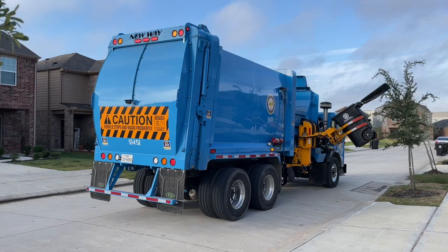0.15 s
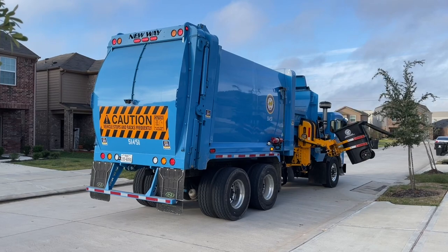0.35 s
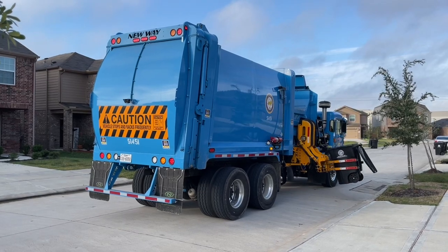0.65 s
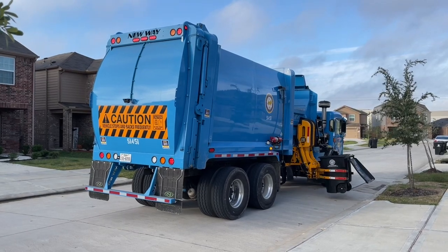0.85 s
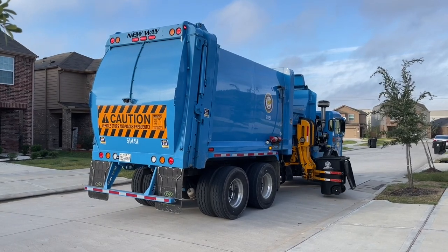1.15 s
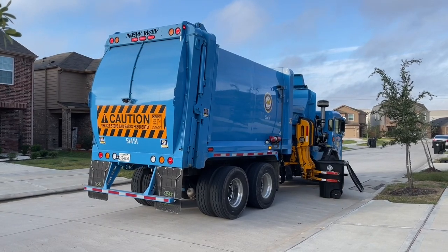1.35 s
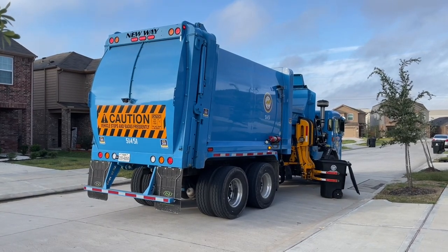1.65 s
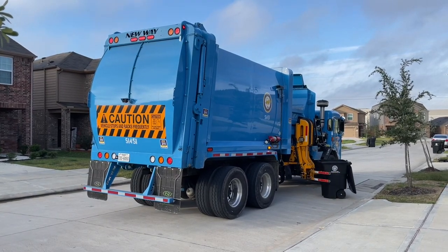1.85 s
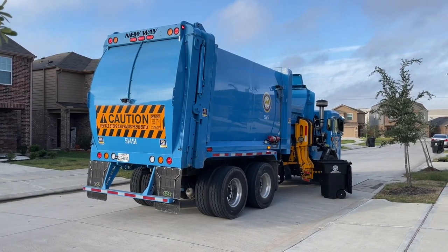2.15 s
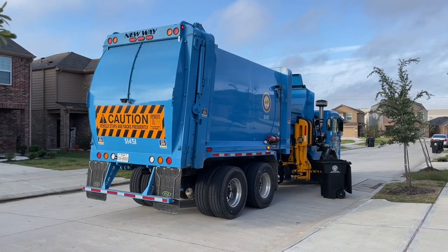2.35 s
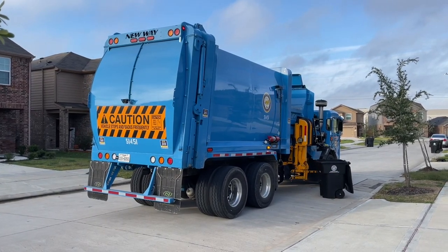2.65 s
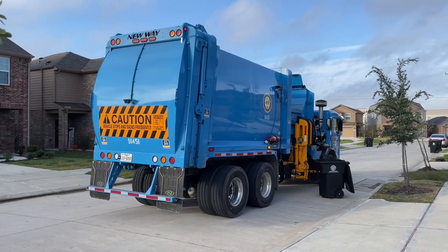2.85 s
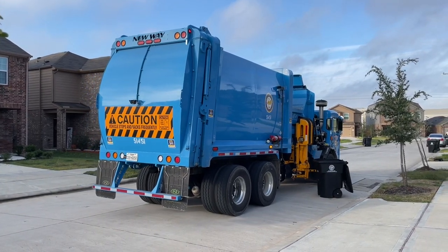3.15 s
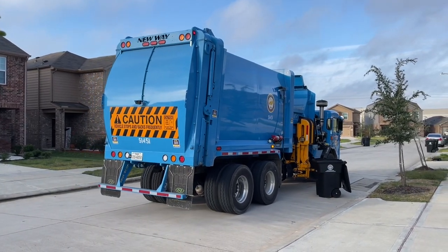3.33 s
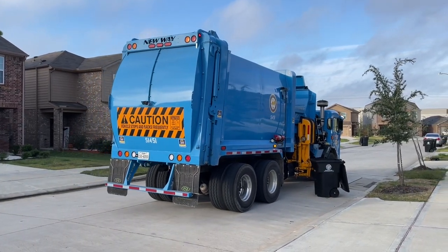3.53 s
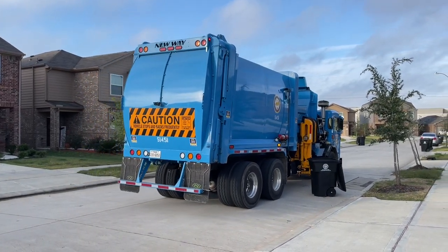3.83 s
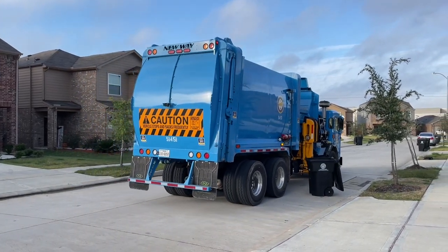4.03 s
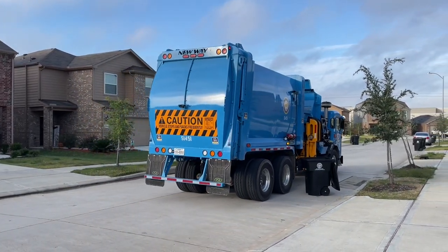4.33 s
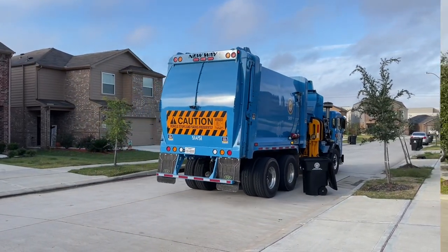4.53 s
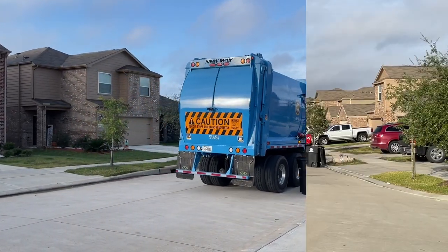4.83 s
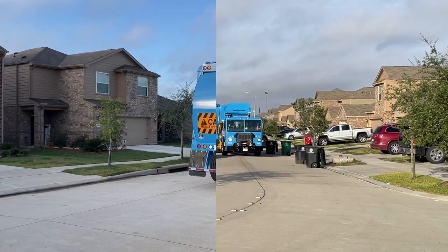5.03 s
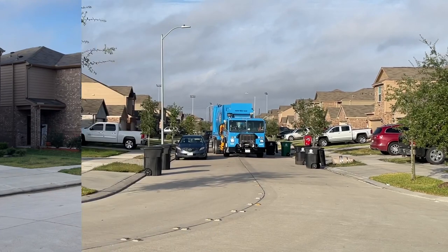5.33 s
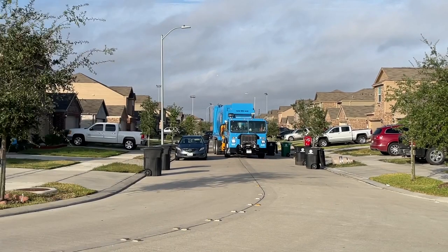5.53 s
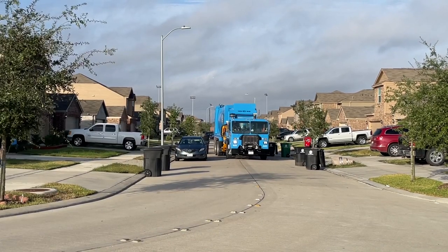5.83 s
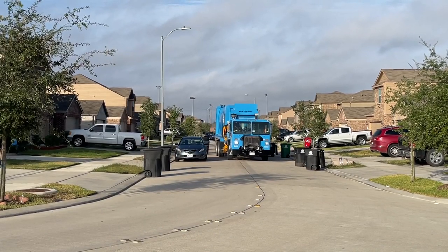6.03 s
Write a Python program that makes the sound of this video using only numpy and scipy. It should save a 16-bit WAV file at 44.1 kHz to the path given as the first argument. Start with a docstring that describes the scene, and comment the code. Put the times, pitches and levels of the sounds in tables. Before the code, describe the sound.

Outdoors on a residential street, heavy wind rumbles and pops on a handheld stereo microphone while a diesel garbage truck idles. Its arm gives brief squeaks and ticks, then an empty plastic bin lands with two hollow, deep booms and rattling knocks. A sharp air-brake hiss follows, then a clank, and the engine revs as the truck drives off with whining gears. The last moment is a quieter, distant engine with wind.

```python
"""Wind buffets and pops on a pair of microphone ports while a refuse truck idles: low noise and chirped pulses.
Its arm squeaks as frequency glides and ticks; a plastic cart booms twice on the road through its resonances.
The brakes vent as shaped noise with a whistle, then the truck pulls away: exhaust orders as sines, noise
throbbing with the firings, and whining gears and turbo. From 5.4 s the engine sound is fainter."""
import sys
import numpy as np
from scipy import signal
from scipy.fft import rfft, irfft, next_fast_len
from scipy.io import wavfile
from scipy.ndimage import uniform_filter1d

SR = 44100
rng = np.random.default_rng(int(sys.argv[2]) if len(sys.argv) > 2 else 0)


def dump(signal):
    """Clip the signal to [-1, 1] and save it as 16-bit WAV at the path in sys.argv[1]."""
    limited = np.clip(np.atleast_2d(signal).T, -1, 1)
    pcm = np.round(limited * 32767).astype(np.int16)
    wavfile.write(sys.argv[1], SR, pcm)


N = 272427
T = np.arange(N) / SR
M = next_fast_len(N + N % 2)   # transform length
HZ = np.maximum(np.arange(M // 2 + 1) * SR / M, 1)

# Engine noise: (time [s], rumble [dB], clatter [dB], injector hiss [dB])
LOAD = [(0, -47, -35, -41), (.9, -59, -33.5, -43), (1.15, -32.5, -34, -47.5), (1.6, -27.5, -35.5, -47.5),
        (2.2, -28, -34.5, -47), (2.6, -30, -32.5, -44.5), (3.6, -30.5, -31.5, -40.5),
        (4.08, -24.5, -31, -39), (4.58, -22, -29.5, -38), (5.0, -27, -34, -43), (5.18, -27.5, -37, -46),
        (5.33, -31.5, -40.5, -51), (5.5, -39.5, -40, -51.5), (6.18, -37, -37.5, -50.5)]
# Wind on the ports, one list per gusty stretch: (time [s], buffet level [dB])
GUSTS = [
    [(0, -17.5), (.1, -26.5), (.21, -19.5), (.27, -28), (.31, -26), (.35, -33), (.4, -21.5), (.5, -24),
     (.72, -28), (.82, -26.5), (.92, -32.5), (1.0, -31.5), (1.12, -40), (1.18, -26), (1.3, -54)],
    [(5.1, -31.5), (5.38, -33), (5.46, -27.5), (5.52, -33), (5.7, -23.5), (5.8, -36.5), (6.0, -36),
     (6.12, -29.5), (6.18, -41)],
]


def amp(db):
    """Amplitude ratio from a level in decibels."""
    return 10 ** (np.asarray(db) / 20)


def rms_one(x):
    """Normalization of the mean square: scale to unit rms."""
    return x / np.sqrt(np.mean(x ** 2) + 1e-20)


def in_time(rows):
    """Linear interpolation: each column per sample, then a gate that is open while the curve lasts."""
    s, *columns = np.transpose(rows)
    gate = np.clip(np.minimum(T - s[0], s[-1] - T) * 200 + 1, 0, 1)   # 5 ms edges
    return [np.interp(T, s, c) for c in columns] + [gate]


def span(s, length, first, last):
    """Linear glide from first to last, holding its end values outside the event."""
    return first + (last - first) * np.clip((T - s) / length, 0, 1)


def decay_db(s, t60_s):
    """Exponential decay: a level falling 60 dB in t60_s from time s, flat before."""
    return -60 * np.maximum(T - s, 0) / t60_s


def at_hz(points):
    """Interpolation on logarithmic frequency: a spectrum table on the FFT grid."""
    hz, value = np.transpose(points)
    return np.interp(np.log(HZ), np.log(hz), value)


def coloured(x, spectrum):
    """Spectral shaping by multiplication in frequency, falling steeply beyond the ends; rms 1."""
    (low_hz, low_db), (high_hz, high_db) = spectrum[0], spectrum[-1]
    ends = [(low_hz / 2, low_db - 40)] + list(spectrum) + [(high_hz * 2, high_db - 40)]
    return rms_one(irfft(rfft(x, M) * amp(at_hz(ends)), M)[:N])


def drift(rate_hz):
    """Low-pass filtered chance: a slow random curve of rms 1, drawn at every 8th sample."""
    r = np.exp(-2 * np.pi * rate_hz * 8 / SR)
    draws = rng.standard_normal(N // 8 + 5002)
    slow = signal.lfilter([1], [1, -2 * r, r * r], draws)[5000:]   # skip the settling
    return np.interp(np.arange(N) / 8, np.arange(len(slow)), rms_one(slow))


def tone(hz, level_db, waver):
    """Random frequency and amplitude modulation: a sine whose pitch and strength waver."""
    turns = np.cumsum(hz * (1 + waver * drift(29.6))) / SR
    return np.sqrt(2) * amp(level_db + 2.5 * drift(10)) * np.sin(2 * np.pi * turns)


def resonate(x, hz, width_hz):
    """Damped oscillator as a two-pole resonance, gain 1 on top."""
    r = np.exp(-np.pi * width_hz / SR)
    poles = [1, -2 * r * np.cos(2 * np.pi * hz / SR), r * r]
    return signal.lfilter([(1 - r * r) / 2, 0, (r * r - 1) / 2], poles, x)


def modes_of(x, modes, sign=1):
    """Modal superposition: parallel resonances, signs alternating if sign is -1; rms 1."""
    return rms_one(sum(sign ** k * amp(db) * rms_one(resonate(x, hz, width_hz))
                       for k, (hz, width_hz, db) in enumerate(modes)))


def small_pops():
    """Random arrivals: lesser eddies, as (time, level, first Hz), follow the strength of the gust."""
    pops_per_s, highest_db = 70, 4   # level above the buffet
    rows = []
    for gust in GUSTS:
        s, db = np.transpose(gust)
        when, weakness, pitch = rng.random((3, round(pops_per_s * (s[-1] - s[0]))))
        at = s[0] + (s[-1] - s[0]) * when
        rows += zip(at, np.interp(at, s, db) + highest_db - 12 * weakness, 400 + 730 * pitch)
    return rows


def wind():
    """Turbulent pressure: lumpy low noise, partly own to each port, and pops falling in pitch as eddies slow."""
    # Spectrum of the wind noise: (frequency [Hz], relative density [dB])
    buffet = [(35, -1.5), (70, 9.5), (130, 1), (250, -6.5), (450, -20), (900, -63)]
    # Eddies bursting on the ports: (time [s], level [dB], first frequency [Hz])
    large_pops = [(.005, -12, 450), (.022, -10.5, 1074), (.058, -16, 460), (.085, -10.5, 443),
                  (.221, -5.5, 895), (.276, -14, 710), (.298, -11, 984), (.304, -11, 433), (.374, -13, 510),
                  (.386, -9.5, 640), (.402, -17, 590), (.412, -10, 705), (.418, -10, 936), (.436, -9, 1005),
                  (.457, -13.5, 613), (.521, -7.5, 874), (.526, -11, 750), (.566, -16, 1470),
                  (.572, -16, 890), (.581, -8, 950), (.6, -23, 610), (.625, -9.5, 950), (.634, -12, 817),
                  (.658, -14.5, 913), (.684, -12.5, 900), (.697, -29, 490), (.733, -10.5, 424),
                  (.76, -11, 910), (.777, -16, 866), (.794, -6.5, 650), (.806, -13, 694), (.823, -21, 587),
                  (.85, -15, 454), (.891, -11, 596), (.903, -23, 800), (2.343, -11.5, 524),
                  (5.199, -15, 800), (5.204, -12, 1006), (5.295, -16.5, 600), (5.353, -19, 700),
                  (5.394, -16, 696), (5.599, -17, 750), (5.655, -19.5, 490), (5.676, -19, 477),
                  (5.711, -10.5, 1037), (5.721, -20, 546), (5.817, -20, 448), (5.96, -16, 453),
                  (6.069, -15, 552)]
    own_db, end_hz, second_harmonic, rough_share = -15, 75, 0.23, 0.26
    mean_sweep_s, rise_s, fade_s = 0.00688, 0.0029, 0.0077

    lumps = amp(3.3 * drift(18))
    shared, own = (coloured(rng.standard_normal(N) * lumps, buffet) for _ in range(2))
    strength = sum(gate * amp(db) for db, gate in map(in_time, GUSTS))
    out = strength * (shared + amp(own_db) * own * [[1], [-1]])
    ragged = coloured(rng.standard_normal(N), [(150, 1.0), (500, -9.5), (1100, -32)])
    t, pops = T[:SR // 10], list(large_pops) + small_pops()
    for (s, db, hz), (start, skew, size) in zip(pops, rng.random((len(pops), 3))):
        sweep_s = mean_sweep_s * (0.644 + 0.74 * size)   # eddies differ in size
        turns = end_hz * t + (hz - end_hz) * sweep_s * (1 - np.exp(-t / sweep_s)) + start
        # one port feels it a little sooner
        angle = 2 * np.pi * (turns + 0.26 * (skew - .5) * np.array([[1], [-1]]))
        pulse = np.sin(angle) + second_harmonic * np.sin(2 * angle)   # lopsided pressure
        pulse = pulse + rough_share * ragged[round(s * SR) % (N - len(t)):][:len(t)]
        envelope = amp(db) * (1 - np.exp(-t / rise_s)) * np.exp(-t / fade_s)
        i = min(round(s * SR), N - 1)
        out[:, i:i + len(t)] += (envelope * pulse)[:, :N - i]
    return out


def pump():
    """Periodic displacement as one sine, its level following the clatter."""
    hz, start_db = 665, -51.5
    clatter_rise_db = in_time(LOAD)[1] - LOAD[0][2]
    return tone(hz, start_db + clatter_rise_db, waver=.0022)


def squeaks():
    """Stick-slip friction of the arm and brakes: sine glides roughened in pitch and strength."""
    # (time [s], length [s], first frequency [Hz], last frequency [Hz], level [dB], roughness [Hz])
    glides = [(.135, .025, 4950, 5200, -34, 120), (.16, .07, 5500, 7800, -42, 150),
              (.18, .025, 6450, 6600, -41, 80), (.235, .03, 8400, 8600, -41, 60),
              (.185, .02, 9900, 10000, -46, 80), (.2, .06, 11000, 12800, -48, 150),
              (.55, .07, 10800, 12800, -51, 150), (.195, .045, 3650, 3950, -32, 40),
              (.32, .03, 9950, 10000, -47, 80), (.45, .035, 5700, 5750, -43, 80),
              (.712, .035, 3380, 3500, -39, 150), (.742, .028, 3530, 3680, -32, 60),
              (.768, .055, 3480, 3650, -38, 200), (2.36, .012, 3650, 3650, -35, 100),
              (2.392, .012, 3650, 3650, -28, 100), (.137, .018, 4400, 4500, -34, 120),
              (.48, .02, 4500, 4600, -43, 120)]
    out = np.zeros(N)
    slip, grip = drift(300), 1 + .4 * drift(150)
    for s, length, first_hz, last_hz, db, rough_hz in glides:
        progress = np.clip((T - s) / length, 0, 1)
        hz = first_hz + (last_hz - first_hz) * progress + rough_hz / 2 * slip
        envelope = amp(db) * np.sqrt(np.abs(np.sin(np.pi * progress)))
        out += envelope * grip * np.sin(2 * np.pi * np.cumsum(hz) / SR)
    return out


def arm_ticks():
    """Impact and damping: steel ticks in the arm are bright noise under exponential decay."""
    # (time [s], initial level [dB])
    ticks = [(0.56, -30), (1.122, -26), (1.1524, -41), (1.5093, -32.5), (1.58, -51), (1.881, -30.5),
             (1.9227, -38)]
    steel = coloured(rng.standard_normal(N),
                     [(1500, 19.0), (3000, 17.0), (6000, 12.0), (11000, 4.5), (15500, -9)])
    return sum((T >= s) * amp(db + decay_db(s, t60_s=.076)) for s, db in ticks) * steel


def brake_linkage():
    """Modal ringing as the brake linkage lets go: filtered noise with a fast decay and a slow tail."""
    # Clank resonances: (frequency [Hz], width [Hz], relative level [dB])
    clank = [(1950, 300, -7), (2950, 350, -2), (3200, 300, 0), (3430, 300, -3), (4400, 600, -6)]
    s, rise_s = 3.784, .0083
    envelope = sum(amp(db + decay_db(s, t60_s)) for db, t60_s in [(-20, .07), (-29, .3)])
    return span(s, rise_s, 0, .83) * envelope * modes_of(rng.standard_normal(N), clank)


def cart():
    """Modal excitation: the hollow body booms and drums, and each blow sets the stiff parts crackling."""
    # Resonances of the cart: (frequency [Hz], width [Hz], relative level [dB])
    body_modes = [(62, 26, -2.5), (136.5, 16, 0), (197, 53, -2.5), (250, 32, -0.5), (270, 22, -0.5),
                  (326, 27, -1), (370, 260, -8.5), (725, 77, -4), (844, 33, -7.5), (1096, 127, -7.5),
                  (1410, 160, -10.5), (1690, 170, -13), (2180, 350, -18)]
    # Booms on meeting the road, one list each: (time [s], frequency [Hz], level [dB], wall drumming [dB])
    booms = [
        [(1.357, 107.8, -21, -11), (1.371, 112, -4, -14), (1.393, 109.6, -15, -9.5), (1.427, 94.6, -11, -12.5),
         (1.457, 95, -4, -16), (1.47, 98.2, -27, -14)],
        [(1.478, 84, -12, -17.5), (1.502, 88, -31, -16.5), (1.512, 91, -34, -16), (1.526, 95, -16, -14),
         (1.546, 100, -22, -14), (1.58, 93.2, -14.5, -25), (1.598, 90.0, -48, -16)],
        [(1.606, 89.7, -37, -20), (1.612, 90.4, -42, -17), (1.632, 95.5, -19, -28), (1.67, 92.4, -16, -26),
         (1.694, 89, -43, -18.5), (1.714, 89, -13, -30), (1.74, 92.6, -36, -44)],
        [(1.888, 95.7, -42, -24), (1.896, 99, -9.5, -18.5), (1.924, 100, -13, -17.5), (1.972, 91, -38, -21.5)],
    ]
    # Blows on the road: (time [s], level [dB])
    blows = [(1.355, -18), (1.371, -28), (1.384, -28), (1.398, -23), (1.414, -27), (1.43, -32),
             (1.447, -26), (1.462, -27), (1.506, -24), (1.524, -32), (1.538, -28), (1.579, -29),
             (1.61, -38), (1.695, -35), (1.725, -38), (1.889, -29), (1.924, -32)]
    knocks_per_s, spread_db = 1100, 2
    blow_t60_s, crack_t60_s, crack_db = .14, .05, -1.5   # each blow starts with a short crack

    sizes = amp(spread_db * np.minimum(rng.exponential(1, N), 3)) * rng.choice([-1, 1], N)
    knocks = (rng.random(N) < knocks_per_s / SR) * sizes
    walls = modes_of(rng.standard_normal(N), body_modes[:7], sign=-1)
    stiff = modes_of(knocks, body_modes[6:], sign=-1)
    out = np.zeros(N)
    for rows in booms:
        hz, db, wall_db, gate = in_time(rows)
        boom = np.sqrt(2) * amp(db) * np.sin(2 * np.pi * np.cumsum(hz) / SR)
        out += gate * (boom + amp(wall_db) * walls)
    for s, db in blows:
        envelope = amp(db + decay_db(s, blow_t60_s)) + amp(db + crack_db + decay_db(s, crack_t60_s))
        out += (T >= s) * envelope * stiff
    # plastic makes a soft contact
    return signal.sosfilt(signal.butter(2, 3200, fs=SR, output="sos"), out)


def valve():
    """Flow-excited tones: the valve hoots at two pitches about an octave apart."""
    # (time [s], length [s], first frequency [Hz], last frequency [Hz], first level [dB], last level [dB])
    hoot = (2.19, .075, 991, 991, -35, -40)
    # Its octave, same columns
    octave = (2.19, .08, 2000, 2050, -39, -43)
    edge_s = .023
    out = np.zeros(N)
    for (s, length, first_hz, last_hz, first_db, last_db), waver in [(hoot, .008), (octave, .012)]:
        edge = np.clip(np.minimum(T - s, s + length - T) / edge_s + .5, 0, 1)
        out += edge * tone(span(s, length, first_hz, last_hz), span(s, length, first_db, last_db), waver)
    return out


def vent():
    """Jet noise with flow-excited resonances: bright air, a brief rough whistle, and a duller sigh."""
    # Spectrum of the jet: (frequency [Hz], relative density [dB])
    jet_colour = [(1200, -15), (2200, -6), (4000, -7), (6000, -7), (8000, -5), (9200, -2), (10800, 0),
                  (12500, -5), (15800, -12)]
    # Pipes the sigh rings in: (frequency [Hz], width [Hz], relative level [dB])
    pipes = [(2000, 200, -2), (3100, 300, -1), (3600, 250, 0), (4200, 300, -1), (4900, 350, -1),
             (6200, 500, -1), (7200, 500, -4)]
    start_s, opening_s, peak_s, hold_s = 2.163, .013, 2.256, .02
    from_peak_s = np.abs(T - peak_s)

    swell_db = span(start_s, peak_s - start_s, -29, -20)
    jet_db = swell_db - 165 * np.maximum(T - peak_s - hold_s, 0)   # falls 165 dB/s after the hold
    jet = amp(jet_db + 1.5 * drift(40)) * coloured(rng.standard_normal(N), jet_colour)
    jet_body = irfft(rfft(jet, M) * (HZ < 7500), M)[:N]
    jet -= span(start_s, .04, .55, 0) * jet_body   # starts thin; its lower part fills in

    whistle_hz = 11150 - 600 / 2 * (1 + np.tanh((T - peak_s) / .012 / 2))   # drops 600 Hz at the peak
    whistle_db = -20.5 - 6 * ((T - 2.252) / .024) ** 2   # sings briefly
    whistle = np.sin(2 * np.pi * np.cumsum(whistle_hz + 50 * drift(200)) / SR)
    whistle *= amp(whistle_db) * (1 + .35 * drift(250))

    nozzle = amp(-36 - 90 * from_peak_s) * rms_one(resonate(rng.standard_normal(N), 10750, 900))
    sigh = amp(-28.5 - 62 * from_peak_s) * modes_of(rng.standard_normal(N), pipes, sign=-1)
    return span(start_s - opening_s, opening_s, 0, .98) ** 2 * (jet + whistle + nozzle + sigh)


def gears():
    """Tooth-meshing tones: the axle and timing gears each whine as one gliding sine."""
    # Axle gears: (time [s], frequency [Hz], level [dB])
    axle = [(3.7, 150.7, -36), (3.88, 194.8, -34), (3.996, 214.1, -32.5), (4.3, 234.9, -33.5),
            (4.428, 289.6, -33.5), (4.536, 320.2, -33.5), (4.85, 378.3, -31.5), (4.898, 407.3, -55),
            (4.932, 387, -32), (5.18, 439.5, -37.5)]
    # Timing gear, same columns
    timing = [(4.4, 1070, -50), (4.52, 1160, -39), (4.6, 1195, -42), (4.72, 1220, -41), (4.92, 1235, -40),
              (5.1, 1248, -44), (5.25, 1258, -45), (5.36, 1262, -56)]
    out = np.zeros(N)
    for curve, waver in [(axle, .012), (timing, .002)]:
        hz, level_db, gate = in_time(curve)
        out += gate * tone(hz, level_db, waver)
    return out


def turbo():
    """Blade-passing tone and flow noise: a gliding sine with a rush of air."""
    # Whistle: (time [s], frequency [Hz], level [dB])
    whistle = [(3.9, 9500, -75), (4.15, 10500, -61), (4.35, 11650, -58), (4.47, 12450, -55),
               (4.6, 12900, -55), (4.72, 13130, -55), (4.85, 13170, -55), (5.07, 12950, -60),
               (5.5, 12500, -72)]
    # Rush of air: (frequency [Hz], relative density [dB])
    air_colour = [(8500, -2), (11000, 0), (13500, 0), (15500, -12)]
    air_above_whistle_db = 7
    hz, level_db, gate = in_time(whistle)
    air = amp(level_db + air_above_whistle_db) * coloured(rng.standard_normal(N), air_colour)
    return gate * (tone(hz, level_db, waver=.003) + air)


def engine():
    """Harmonic synthesis of exhaust orders, and noise modulated at the firing rate that rings in the block."""
    # Idling then pulling: (time [s], firing rate [1/s], firing tone [dB], overtones [dB])
    run = [(0, 33, -47, -47), (2.55, 33, -48, -48), (2.87, 40, -48, -46), (3.4, 49, -48, -40),
           (3.7, 55, -45, -34), (3.87, 60, -39, -21), (4.02, 63.5, -30, -26), (4.15, 67.5, -27, -26),
           (4.29, 70.7, -20, -21), (4.43, 75.5, -23, -20), (4.52, 79, -21, -20), (4.64, 83.5, -17, -23),
           (4.77, 86, -22, -23), (4.94, 87.4, -25, -24), (5.27, 87, -32, -32), (5.4, 87, -42, -42),
           (6.18, 86, -48, -48)]
    # Exhaust orders: (multiple of firing rate [1], relative level [dB])
    orders = [(.5, -26), (1, 2.5), (1.5, -6), (2, -11), (2.5, -13), (3, -17), (3.5, -21), (4, -20),
              (4.5, -24), (5, -26), (6, -28), (7, -27)]
    # Knock of each cylinder in firing order: relative level [dB]
    cylinders_db = [0, -9, -1, -8, 0, -10]
    # Share of the noise that throbs with the firings: (time [s], share [0-1])
    throb = [(0, .25), (1.0, .3), (1.3, .55), (3.0, .5), (3.6, .25), (6.18, .15)]
    # Colour of the exhaust pipe: (frequency [Hz], gain [dB])
    pipe = [(40, -9), (65, .5), (90, -3), (100, -2), (114, 5), (126, -1), (140, -3), (175, 3), (220, -1),
            (300, -3), (600, -2)]
    # Engine block and panels: (frequency [Hz], width [Hz], relative level [dB])
    block_modes = [(653, 166, 9.5), (799, 42, 6), (1374, 120, 7), (2043, 60, 1), (2960, 1430, 5.5),
                   (3706, 360, 1.5), (4260, 170, 1.5)]
    # Spectra of rumble, clatter and injector hiss: (frequency [Hz], relative density [dB])
    rumble_colour = [(15, -37), (25, -53), (48, 2), (91, 0.5), (149, -1), (253, -2), (325, -6.5),
                     (653, -13), (700, -11), (910, -12.5), (1540, -120)]
    clatter_colour = [(260, -2), (450, -17.5), (503, -7.5), (673, -2.5), (951, -1), (1380, 0), (1660, -7),
                      (2060, -5), (2720, -8.5), (3180, -6), (4300, -14), (5140, -18.5), (6500, -17),
                      (8450, -36), (14300, -120)]
    hiss_colour = [(2000, -6), (3500, 6), (5000, 3), (6500, 0), (8200, 0), (9800, -1), (11500, -7),
                   (13300, -8), (15800, -13)]
    knock_share, flare_rise_s, block_db = .87, .0026, -5   # knock decay in firing intervals

    rate, tone_db, overtone_db, _ = in_time(run)
    rumble_db, clatter_db, hiss_db, _ = in_time(LOAD)
    turns = np.cumsum(rate) / SR + 0.4
    strength = amp(np.array(cylinders_db)[turns.astype(int) % 6])
    flare = strength * np.exp(-(turns % 1) / knock_share)
    flare = rms_one(uniform_filter1d(flare, round(flare_rise_s * SR)))
    throbbing = 1 + in_time(throb)[0] * (flare - 1)

    exhaust = np.zeros(N)
    for k, order_db in orders:
        pipe_db = np.interp(k * rate, *np.transpose(pipe))
        level_db = order_db + pipe_db + (tone_db if k < 2 else overtone_db) + 1.1 * drift(4)
        exhaust += np.sqrt(2) * amp(level_db) * np.sin(2 * np.pi * (k * turns + rng.random()))

    rumble = amp(rumble_db + 1.5 * drift(8)) * coloured(rng.standard_normal(N), rumble_colour)
    drive = rng.standard_normal(N) * throbbing
    block = rms_one(sum(amp(db) * rms_one(resonate(resonate(drive, hz, width_hz), hz, width_hz))
                        for hz, width_hz, db in block_modes))
    rattle = coloured(rng.standard_normal(N) * np.sqrt(throbbing), clatter_colour)
    clatter = amp(clatter_db + 0.97 * drift(12.5)) * (rattle + amp(block_db) * block)
    hiss = amp(hiss_db + 1.2 * drift(3)) * coloured(rng.standard_normal(N) * throbbing, hiss_colour)
    return exhaust + rumble + clatter + hiss


def ports(x, t60_s):
    """Interaural-style coherence: scattered sound differs between the ports; treble reaches the right first."""
    # Likeness of the ports: (frequency [Hz], likeness [0-1])
    likeness = [(40, .9), (80, .98), (150, .96), (300, .93), (400, .85), (900, .66), (1900, .5),
                (3400, .28), (4500, .5), (5500, .25), (7000, .6), (7800, .995), (8800, .995), (9600, .75),
                (10600, .99), (12300, .99), (13200, .7), (14000, .995)]
    # Level difference: (frequency [Hz], left minus right [dB])
    left_lean = [(60, -.7), (250, -.7), (380, 0), (700, .5), (1300, 3), (2000, 0), (3400, 4), (5200, 3),
                 (6200, 0), (15000, 0)]
    lag_s, lag_from_hz = .000161, 5180
    tail = rng.standard_normal(SR // 2) * amp(-60 * T[:SR // 2] / t60_s)
    direct = rfft(x, M)
    scatter = direct * rfft(tail / np.sqrt(np.sum(tail ** 2)), M)
    alike, lean = np.clip(at_hz(likeness), 0, 1), amp(at_hz(left_lean) / 2)
    common, opposed = np.sqrt((1 + alike) / 2) * direct, np.sqrt((1 - alike) / 2) * scatter
    turn = np.exp(1j * np.pi * lag_s * np.maximum(HZ - lag_from_hz, 0))   # half the lag at each port
    left, right = (common + opposed) * lean / turn, (common - opposed) / lean * turn
    return irfft(np.array([left, right]), M)[:, :N]


def scene():
    """Superposition: the truck echoes off the house fronts; the wind is right at the ports."""
    fittings = pump() + squeaks() + arm_ticks() + brake_linkage()
    truck = fittings + cart() + valve() + vent() + gears() + turbo() + engine()
    return wind() + ports(truck, t60_s=.19)


def record(dry):
    """Band limiting and saturation: the deep bass rolls off, peaks are rounded, the top is cut."""
    bass_hz, top_hz = 46.7, 15950
    trimmed = signal.sosfilt(signal.butter(2, bass_hz, "high", fs=SR, output="sos"), dry)
    rounded = 1.186 * np.tanh(trimmed / 1.525)
    return signal.sosfilt(signal.cheby2(20, 70, top_hz, fs=SR, output="sos"), rounded)


dry = scene()
out = record(dry)
dump(out)
```